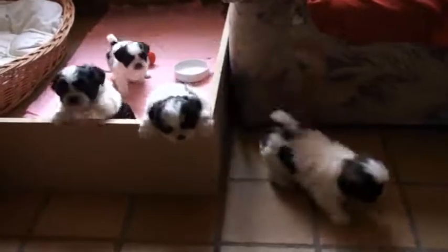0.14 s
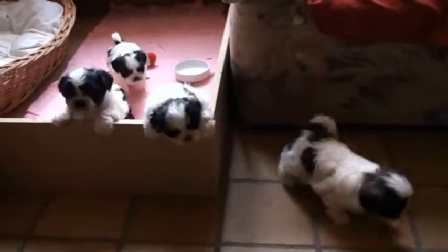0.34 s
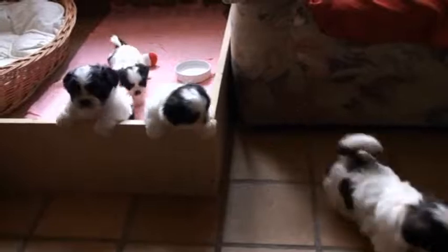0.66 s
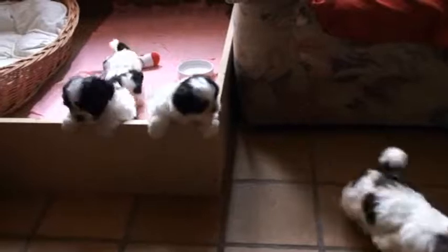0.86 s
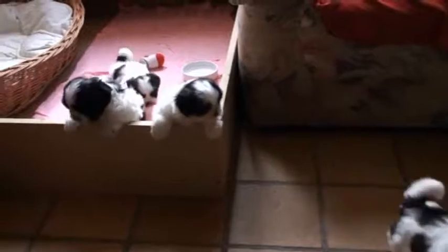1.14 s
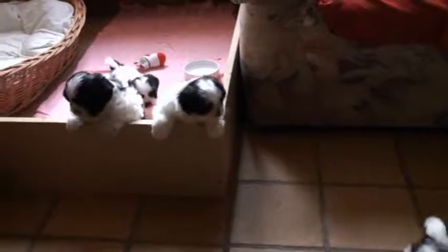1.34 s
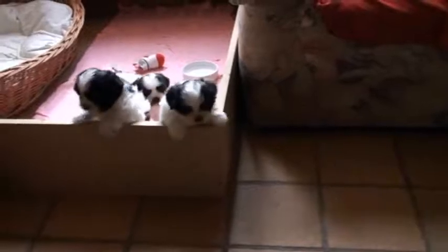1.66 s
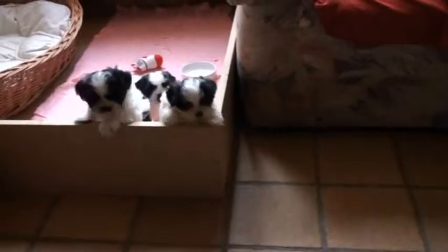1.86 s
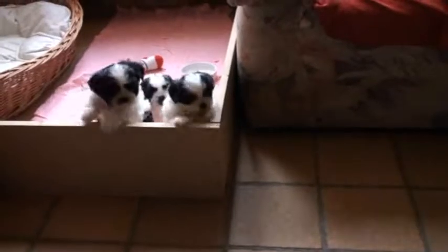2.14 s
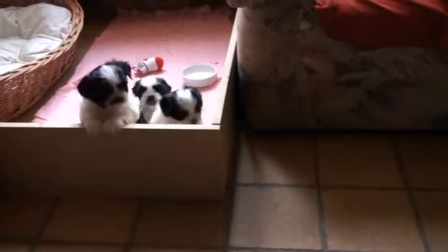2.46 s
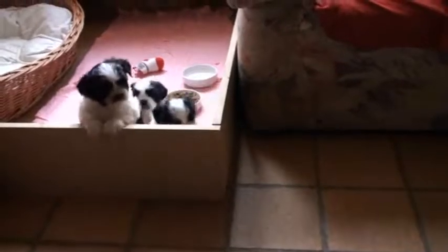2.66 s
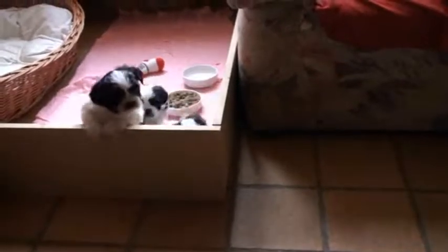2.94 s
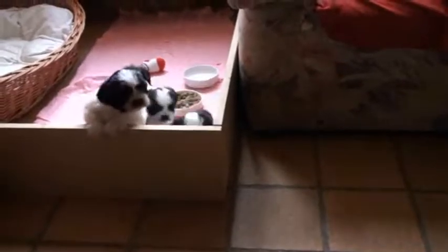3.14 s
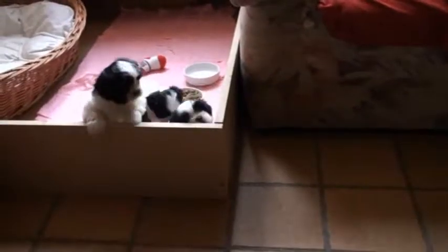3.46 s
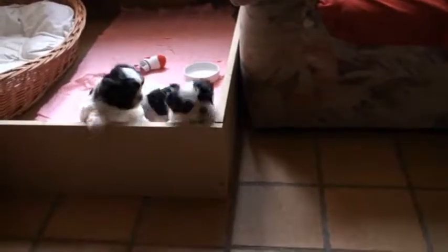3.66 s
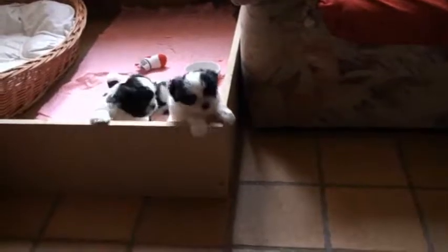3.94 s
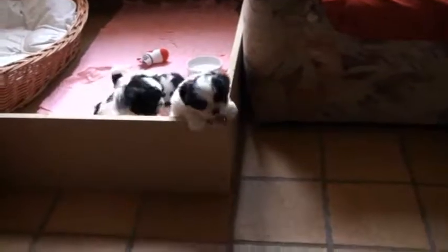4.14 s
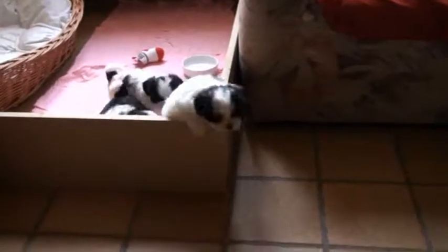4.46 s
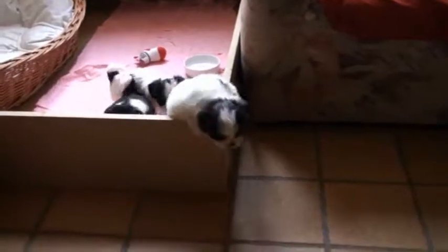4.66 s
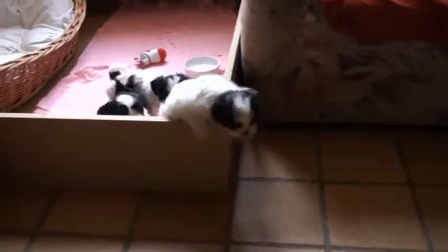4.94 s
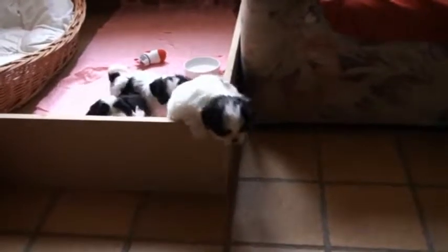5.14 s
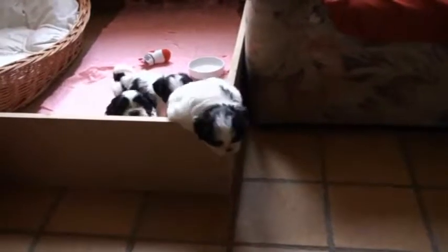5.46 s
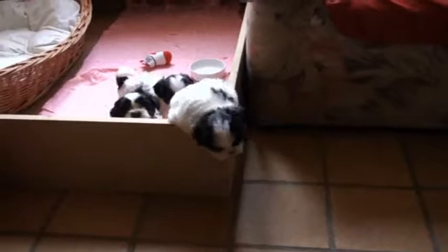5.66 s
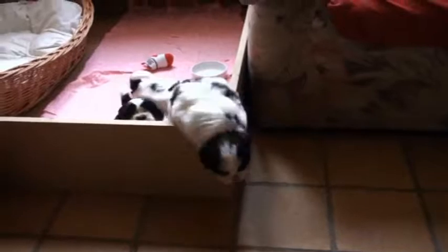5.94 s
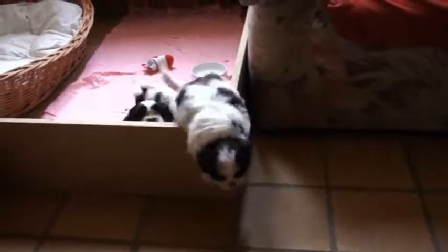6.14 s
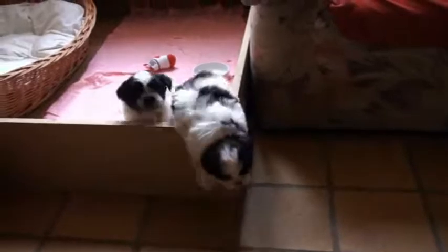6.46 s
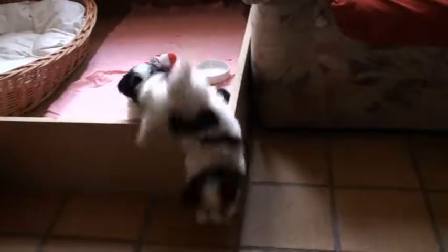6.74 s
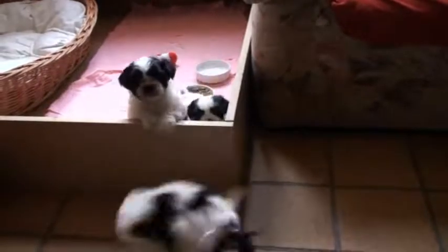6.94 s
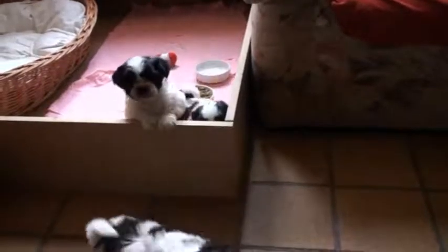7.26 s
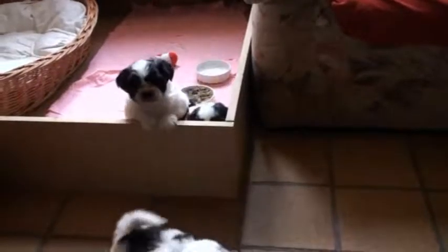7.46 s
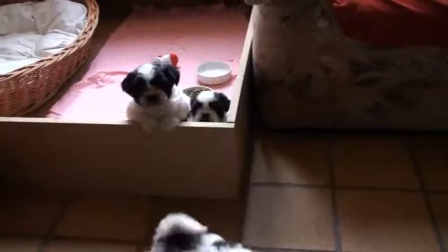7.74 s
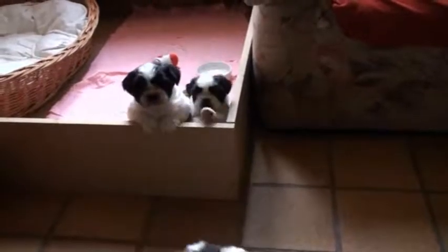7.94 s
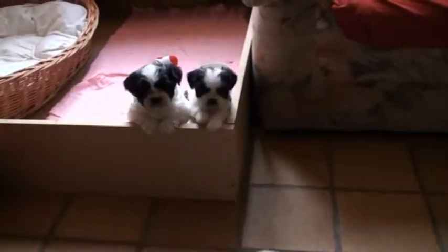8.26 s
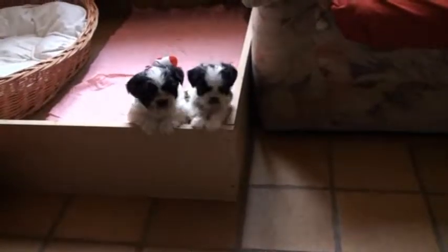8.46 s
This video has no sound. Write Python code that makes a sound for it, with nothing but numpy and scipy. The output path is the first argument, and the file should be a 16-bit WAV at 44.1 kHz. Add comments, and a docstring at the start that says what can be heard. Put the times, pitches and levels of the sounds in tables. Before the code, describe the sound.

In a quiet tiled room with faint air noise and low rumble, a shrill yelp sounds from farther off at 0 s as fur brushes wood. Tiny nearer yips, distant yelps and light paw taps scatter through the first 1.2 s. From 1.5 to 4.2 s, puppies in a wooden box give six gliding, wavering whines around 1 kHz, rough at the edges, with soft thuds near 1.7 and 1.9 s. A shaky far squeal overlaps around 4 s, then a strong hissing paw scrape at 4.4 s. Short yips, knocks and a low gruff grumble at 5.4 s follow. From 6.15 to 6.7 s a loud, piercing, echoing squeal swings up and down. At 6.8-6.95 s a puppy tumbles out with heavy wooden thumps and claw clicks; small steps and scuffs fade until 8.5 s, when one faint yelp ends it. The sound leans right.

```python
"""A shrill yelp from farther off, carried mostly by the room, sounds as fur brushes boards in a quiet room.
Puppies whine and yip in a wooden box on a tiled floor, a little to the right: gliding harmonic voices.
Paws knock and scrape on the box, as decaying modes, thuds and shaped friction noise; one puppy tumbles
over the edge, lands on the tiles and pads away. Echoes, box reflections and a diffuse tail add the space."""
import sys
import numpy as np
from scipy import signal
from scipy.fft import rfft, irfft
from scipy.io import wavfile

SR = 44100
rng = np.random.default_rng(int(sys.argv[2]) if len(sys.argv) > 2 else 0)


def transcribe(signal):
    """Save signal, clipped to [-1, 1], as a 16-bit WAV file at the path in sys.argv[1]."""
    frames = np.atleast_2d(signal).T
    limited = np.clip(frames, -1, 1)
    pcm = np.round(limited * 32767).astype(np.int16)
    wavfile.write(sys.argv[1], SR, pcm)


N = 379260
TIME = np.arange(N) / SR
EDGE_HZ = 15850  # upper band limit

# broadband spectrum shared by claw impacts and breath: [f/Hz, level/dB]
CLAW_COLOUR = [(300, -12), (1500, -4), (2700, -4), (3300, -11.5), (4000, -8.5), (7000, -15.5), (10000, -25),
               (16000, -38)]


def amp(db):
    """Level definition: decibels to an amplitude ratio."""
    return 10 ** (np.asarray(db) / 20)


def unit(x):
    """Normalisation to rms 1."""
    return x / np.sqrt(np.mean(x ** 2) + 1e-20)


def read(points, hz):
    """Interpolation of a spectrum along logarithmic frequency."""
    f, value = np.transpose(points)
    return np.interp(np.log(hz + 1), np.log(f + 1), value)


def curves(rows):
    """Piecewise-linear trajectories: the sample times of a table, then its interpolated columns."""
    s, *columns = np.transpose(rows)
    t = np.arange(s[0], s[-1], 1 / SR)
    return [t] + [np.interp(t, s, c) for c in columns]


def add(mix, s, sound):
    """Superposition of a sound onto the mix from time s."""
    part = mix[max(0, round(s * SR)):][:len(sound)]
    part += sound[:len(part)]


def track(sounds):
    """Superposition of (s, sound) pairs on one track."""
    mix = np.zeros(N)
    for s, sound in sounds:
        add(mix, s, sound)
    return mix


def noise(colour, size):
    """Spectral shaping of white noise, scaled to rms 1."""
    hz = np.fft.rfftfreq(size, 1 / SR)
    white = rng.standard_normal(size)
    return unit(irfft(rfft(white) * amp(read(colour, hz)), size))


def waver(rate_hz, size):
    """Low-pass random modulation of up to a second, with rms 1 over that second."""
    hz = np.fft.rfftfreq(SR, 1 / SR)
    white = rng.standard_normal(SR)
    return unit(irfft(rfft(white) / (1 + (hz / rate_hz) ** 4), SR))[:size]


def fade(t, edge):
    """Sine-squared onset and release, each edge seconds long."""
    nearest_end = np.minimum(t - t[0], t[-1] - t)
    return np.sin(np.pi / 2 * np.clip(nearest_end / edge, 0, 1)) ** 2


def gesture(s, length):
    """Time base of a short call: sample times, progress from 0 to 1, and a half-sine arch."""
    t = np.arange(s, s + length, 1 / SR)
    u = (t - s) / length
    return t, u, np.sin(np.pi * u)


def floor(apart=1.0):
    """Partial coherence: room noise partly shared by two microphones, over a common low rumble."""
    # spectrum of the quiet room: [f/Hz, relative level/dB]
    air_colour = [(15, -37), (25, -23), (93, -10.5), (253, -3.5), (389, -7.5), (509, -7.5), (1170, -6.5),
                  (1410, -9.5), (1950, -10.5), (4620, -20), (7910, -21.5), (9810, -28), (15500, -24.5)]
    # air noise before channel balance: [t/s, level/dB]
    air_level = [(0, -48.5), (1.4, -52), (5, -49), (8.6, -53.5)]
    # low rumble before channel balance: [t/s, level/dB]
    rumble_level = [(0, -54), (1.3, -54), (3.5, -63.5), (8.6, -67)]
    # [f/Hz, level/dB]
    rumble_colour = [(15, -2.0), (30, 1), (45, -3.5), (85, 1.0), (140, -7.5), (400, -14), (2000, -76)]
    air = noise(air_colour, N) + apart * np.array([noise(air_colour, N), noise(air_colour, N)])
    rumble = noise(rumble_colour, N)
    air = unit(air) * amp(np.interp(TIME, *np.transpose(air_level))) * amp([[-1], [.5]])
    return air + rumble * amp(np.interp(TIME, *np.transpose(rumble_level))) * amp([[-5], [4]])


def room(x, build=0.0057):
    """Diffuse reverberation: independent tails per channel, each band with its own decay time."""
    # reverberation time of the room: [f/Hz, t60/s]
    decay = [(200, 0.38), (700, 0.31), (1700, 0.38), (3200, 0.38), (6000, 0.36), (14000, 0.16)]
    hz, t, z = signal.stft(rng.standard_normal((2, SR)), SR, nperseg=256)
    t60 = read(decay, hz)[:, None]
    envelope = amp(-60 * t / t60) * (1 - np.exp(-t / build))
    tail = signal.istft(z * envelope, SR, nperseg=256)[1]
    tail /= np.linalg.norm(tail, axis=1, keepdims=True)
    return signal.fftconvolve(x[None], tail, axes=1)[:, :N]


def box(x, t60=0.1):
    """Dense early reflections: a quick decaying spray between the walls of the box."""
    t = np.arange(SR // 12) / SR
    spray = rng.standard_normal((2, len(t))) * amp(-60 * t / t60) * (t > .003)
    spray /= np.linalg.norm(spray, axis=1, keepdims=True)
    return signal.oaconvolve(x[None], spray, axes=1)[:, :N]


def reflect(x):
    """Comb interference: direct sound plus delayed copies makes gliding notes swell and dip."""
    # first reflections off box and floor, a list for the left then the right: [delay t/s, gain]
    echoes = [
        [(.0023, .14), (.0061, .14)],
        [(.0031, 0.21), (.0074, .12)],
    ]

    def echo(delay, gain):
        """Propagation delay: an attenuated later copy."""
        return gain * np.interp(TIME - delay, TIME, x, left=0)

    return np.array([x + sum(echo(*row) for row in port) for port in echoes])


def grumble():
    """Source-filter voice: a low gruff unsteady harmonic stack through a half-closed mouth."""
    # a grumble from across the room: [t/s, mean pitch f/Hz, level/dB]
    path = [(5.378, 270.6, -32.5), (5.42, 310.7, -35.5), (5.455, 350, -40), (5.48, 263, -35.5),
            (5.52, 245, -51)]
    # filtering by throat and mouth: [f/Hz, level/dB]
    throat = [(150, -32), (300, -4), (550, -5), (950, 8), (1500, -12.5), (2500, -10.5), (5000, -52)]
    t, hz, level_db = curves(path)
    turns = np.cumsum(hz * (1 + .022 * waver(120, len(t)))) / SR
    stack = sum(amp(read(throat, k * hz)) * np.sin(2 * np.pi * k * turns) for k in range(1, 13))
    return t[0], amp(level_db) * unit(stack) * fade(t, 0.014)


def squeal(t, hz, level_db, jitter=0.0299, wheeze=0.0706, firm_db=-32, flutter=0.2,
           second_db=-17.5, third_db=-30, grain_db=3):
    """Unstable phonation: shaky and rasping when low, wheezy when weak, nearly pure when loud and high."""
    # rasping air in a distant yelp: [f/Hz, level/dB]
    rasp_colour = [(800, -51), (2000, 6.5), (3000, -2), (3900, -5.5), (5000, -6), (6000, -2.5), (7200, -17),
                   (9000, -13.5), (11000, -30), (15500, -24)]
    size = len(t)
    weak = np.clip((firm_db - level_db) / 10, 0, 1)
    shake = jitter * np.minimum((2700 / hz) ** 4, 2) * waver(136.3, size)
    shake = shake + wheeze * weak * waver(434, size)
    turns = np.cumsum(hz * (1 + shake)) / SR
    harmonics_db = [0, second_db, third_db]
    stack = sum(amp(db) * np.sin(2 * np.pi * (k + 1) * turns) for k, db in enumerate(harmonics_db))
    voice = amp(level_db) * unit(stack * (1 + flutter * waver(220, size)))
    # above the knee, rasp grows only 0.152 dB for each dB of voice
    knee_db = -23
    rasp_db = np.minimum(level_db, knee_db + 0.152 * (level_db - knee_db))
    # it lies 11 dB lower at 2.7 kHz and clears by 17 dB per octave as the pitch climbs
    rasp_db = rasp_db - 11 - 17 * np.log2(hz / 2700)
    rasp = amp(rasp_db + grain_db * waver(150, size)) * noise(rasp_colour, size)
    return t[0], (voice + rasp) * fade(t, 0.0016)


def yelp(s, length, from_hz, to_hz, arch_hz, level_db, swell_db):
    """Frequency modulation: a short squeal on one bent glide."""
    t, u, arch = gesture(s, length)
    hz = from_hz + (to_hz - from_hz) * u + arch_hz * arch
    return squeal(t, hz, level_db + swell_db * (u - .5))


def scuff(s, length, level_db, grain_db=2):
    """Sliding friction: grainy noise of a paw that swells and fades."""
    # paws and fur sliding on wood and tile: [f/Hz, level/dB]
    colour = [(200, -9), (900, 0), (2000, -1), (3500, -6), (7500, -3.5), (10000, -8), (16000, -17)]
    size = int(length * SR)
    grain = amp(level_db + grain_db * waver(140, size))
    return s, grain * noise(colour, size) * np.sin(np.linspace(0, np.pi, size))


def hiss(s, rise, fall, level_db, colour, sag_db=15, grain_db=-1.0):
    """Stroke friction: sputtering noise swells, then sags as the paw slows."""
    t = np.arange(0, rise + fall, 1 / SR)
    swell = np.sin(np.pi / 2 * np.minimum(t / rise, 1)) ** 2
    shape = swell * amp(-sag_db * np.maximum(t - rise, 0) / fall)
    return s, shape * amp(level_db + grain_db * waver(200, len(t))) * noise(colour, len(t))


def ring(modes, t):
    """Modal superposition: decaying partials, slightly detuned for each blow."""
    def mode(hz, db, t60):
        """Damped resonance with a random sign."""
        detuned_hz = hz * rng.uniform(0.95, 1.03)
        return amp(db - 60 * t / t60) * np.sin(2 * np.pi * detuned_hz * t) * rng.choice([-1, 1])

    return sum(mode(*row) for row in modes)


def knock(s, thud_db, thud_hz, wood_db, claw_db, thud_t60=0.16, claw_t60=0.024, soft=0.0026):
    """Impact excitation: a soft weight thuds, the boards ring briefly, a claw clicks."""
    # modes of the boards before detuning: [f/Hz, level/dB, t60/s]
    wood = [(142, -15.5, 0.12), (204, -3, 0.15), (439, -3.5, 0.11), (505.5, -2, 0.11), (557, -1, 0.061),
            (662, -2, 0.045), (794, -1, 0.057), (1025, 6, 0.019), (1293, -3, 0.028)]
    # noise in the thud: [f/Hz, level/dB]
    thud_colour = [(30, -22), (60, -12), (85, 2), (140, 3), (200, -13), (320, 2), (700, -47), (2000, -71)]
    # modes of a claw on a hard surface before detuning: [f/Hz, level/dB, t60/s]
    clack = [(2604, -6.5, 0.069), (2780, 0.5, 0.023), (3910, -7.5, 0.032), (4150, -21, .02),
             (6600, -17, .02)]
    t = np.arange(SR // 2) / SR
    pitch = thud_hz * (1 + 0.27 * np.exp(-t / 0.015))  # the body is stiffest as it lands, then gives
    tone = np.sin(2 * np.pi * np.cumsum(pitch) / SR)
    thud = amp(-60 * t / thud_t60) * (0.63 * noise(thud_colour, len(t)) + tone)
    body = amp(thud_db) * thud + 0.64 * amp(wood_db) * ring(wood, t)
    claw = 0.84 * noise(CLAW_COLOUR, len(t)) * amp(-60 * t / claw_t60) + 0.57 * ring(clack, t)
    return s, body * (1 - np.exp(-t / soft)) + amp(claw_db) * claw


def cry(t, hz, level_db, open_db, press_db, rough, build_s, tilt_db, nasal_hz, lift_db,
        tremor=0.004, flutter=0.0044, jitter=0.1103, shimmer=0.89, half_share=0.32, air_db=-34):
    """Source-filter phonation: a harmonic stack whose rough cycles vary and alternate strong and weak."""
    # colour of the small throat above the fundamental: [f/Hz, level/dB]
    throat = [(1700, 18.5), (2400, 18), (3000, 12.5), (3800, -1.5), (5000, -3), (6200, -10.5), (7500, -0.5),
              (8600, -5), (9800, -35), (11500, -9.5), (12800, -14.5), (15500, -20)]
    size = len(t)
    shake = tremor * waver(77, size) + (flutter + jitter * rough) * waver(300, size)
    turns = np.cumsum(hz * (1 + shake)) / SR

    k = np.arange(2, 19)[:, None]
    harmonic_hz = k * hz
    nasal_octaves = 0.14  # half width of the resonance, at 1/e of its dB lift
    nasal_db = lift_db * np.exp(-(np.log2(harmonic_hz / nasal_hz) / nasal_octaves) ** 2)
    gains = amp(read(throat, harmonic_hz) + nasal_db) * (harmonic_hz < EDGE_HZ)

    # an open mouth moves the voice into the harmonics near 2.5 kHz; pressed folds lift the ones above
    upper = np.clip((harmonic_hz - 3400) / 400, 0, 1)
    mouth = gains * (1 - upper)
    press = gains * upper * amp(tilt_db * np.log2(np.minimum(harmonic_hz, 8000) / 6000))
    # upper harmonics grow by 10.5 dB per octave of pitch and 0.42 dB per dB of mouth opening
    upper_db = press_db + 10.5 * np.log2(hz / 1100) + 0.42 * open_db
    # they start 12 dB down, until pressure builds
    upper_db = upper_db - 12 * np.exp(-((t - t[0]) / build_s) ** 2)
    fundamental = 1 / np.hypot(1, amp(open_db))
    mouth_gains = fundamental * amp(open_db) * mouth / np.linalg.norm(mouth, axis=0)
    gains = mouth_gains + amp(upper_db) * press / np.linalg.norm(press, axis=0)

    # an echo in the box partly cancels the fundamental: 4 dB at 1230 Hz
    dip = amp(-4 * np.exp(-((hz - 1230) / 39) ** 2))
    overtones = (gains * np.sin(2 * np.pi * k * turns)).sum(0)
    voice = np.sqrt(2) * (dip * fundamental * np.sin(2 * np.pi * turns) + overtones)
    # the half-pitch cosine makes alternate cycles strong and weak
    voice *= 1 + rough * (shimmer * waver(430, size) + half_share * np.cos(np.pi * turns))
    air = amp(air_db) * (1 + 4 * rough) * noise(CLAW_COLOUR, size)
    return t[0], amp(level_db) * (voice + air) * fade(t, .008)


def yip(s, length, from_hz, to_hz, level_db, swell_db, open_db, press_db, rough, lift_db):
    """Articulated glide: the pitch slides in an S while the mouth opens and shuts once."""
    t, u, arch = gesture(s, length)
    hz = from_hz + (to_hz - from_hz) * np.sin(np.pi / 2 * u) ** 2
    mouth_db = open_db - 7.5 * (1 - arch)  # 7.5 dB more closed at both ends
    roughness = rough * (1 - 0.55 * arch)  # 55 % of it clears in the middle
    return cry(t, hz, level_db + swell_db * (u - .5), mouth_db, press_db, roughness,
               build_s=0.0031, tilt_db=3, nasal_hz=7410, lift_db=lift_db)


def whine(rows, rough_start, rough_end, press_db, build_s, tilt_db, nasal_hz, lift_db):
    """Phonation onset and offset: a gliding cry catches roughly, holds clean and breaks up as it ends."""
    t, hz, level_db, open_db = curves(rows)
    breaking = np.exp(-((t - t[0]) / rough_start) ** 4) + np.exp(-((t[-1] - t) / rough_end) ** 4)
    rough = 0.012 + 0.47 * breaking  # held note, plus the voice catching or giving out
    return cry(t, hz, level_db, open_db, press_db, rough, build_s, tilt_db, nasal_hz, lift_db)


def far_cries():
    """Superposition of the distant yelps, squeals and grumble."""
    # short yelps: [t/s, length t/s, start f/Hz, end f/Hz, arch f/Hz, level/dB, swell/dB]
    yelps = [(0, 0.082, 3357, 2477, -250, -42.5, -5), (0.208, 0.044, 3376, 2550, -150, -38, 12),
             (0.631, .08, 3720, 3500, -1, -50.5, -9), (1.102, .14, 3040, 2520, 197.5, -46.5, 10),
             (2.279, 0.098, 2990, 3350, 2, -46.5, 8), (3.788, 0.088, 2685, 2750, 623, -36.5, -15),
             (5.272, 0.049, 3265, 2530, 100, -41.5, 5), (6.073, 0.078, 2680, 3000, 103, -43, 6),
             (8.509, 0.035, 2904, 1990, -3, -45.5, -2)]
    # one table for each long squeal: [t/s, mean pitch f/Hz, level/dB]
    squeals = [
        [(3.895, 1907, -33.5), (3.925, 2255, -30), (3.965, 1879, -28), (4.015, 2950, -23), (4.05, 2775, -29),
         (4.09, 2090, -26.5), (4.145, 3117, -19), (4.18, 2817, -35.5), (4.24, 2266, -37)],
        [(6.155, 1844, -35), (6.19, 2103, -22), (6.225, 2277, -21), (6.258, 3176, -11.5), (6.295, 3277, -16.5),
         (6.335, 3166, -15.5), (6.37, 2840, -25), (6.395, 1860, -28), (6.45, 2145, -26), (6.505, 3092, -19.5),
         (6.56, 2637, -26), (6.615, 3320, -18), (6.685, 3180, -28), (6.72, 3210, -48)],
    ]
    return track([yelp(*row) for row in yelps] + [squeal(*curves(rows)) for rows in squeals] + [grumble()])


def friction_strokes():
    """Superposition of friction noises from paws and fur."""
    # sliding paws and fur: [t/s, length t/s, level/dB]
    scuffs = [(0.273, 0.2, -47), (0.588, 0.088, -47.5), (1.33, 0.14, -53.5), (2.41, 0.069, -49.5),
              (4.484, 0.16, -52.5), (4.981, 0.21, -51), (5.833, 0.11, -52), (6.85, 0.15, -45),
              (7.047, 0.057, -44), (7.362, 0.15, -52), (7.519, .12, -45), (8.309, .16, -51.5),
              (8.495, 0.05, -64)]
    # sharp hissing scrapes: [t/s, rise t/s, fall t/s, level/dB]
    scrapes = [(4.219, 0.051, 0.048, -33), (4.362, 0.049, .11, -23)]
    # a paw scraping hard on wood: [f/Hz, level/dB]
    scrape_colour = [(500, -48), (1800, -14.5), (2700, -1.5), (3800, -3), (5000, 3), (6500, 0.5),
                     (8000, -7.5), (10500, -14), (12500, -23), (16000, -22)]
    # fur brushing the boards: [t/s, rise t/s, fall t/s, level/dB]
    brushes = [(0, .015, 0.14, -57), (.2, 0.043, 0.082, -43)]
    # brushing fur: [f/Hz, level/dB]
    brush_colour = [(1000, -16), (4000, -15), (7000, 7), (9500, 1), (12000, 1), (15500, -12)]
    sounds = [scuff(*row) for row in scuffs]
    sounds += [hiss(*row, scrape_colour) for row in scrapes]
    sounds += [hiss(*row, brush_colour) for row in brushes]
    return track(sounds)


def paw_knocks():
    """Superposition of impacts on wood and tile, including the tumble and the steps away."""
    # paws and bodies: [t/s, thud level/dB, settled thud f/Hz, knock level/dB, claw click level/dB]
    knocks = [(0.153, -36, 80, -49, -49), (0.166, -42, 84, -42, -27), (.73, -67, 90, -54, -41),
              (1.736, -35, 87, -35, -48), (1.94, -32.5, 92, -32, -51), (2.43, -63, 120, -38, -31),
              (3.771, -55, 99, -52, -34), (4.371, -40.5, 85.5, -64, -41), (4.82, -43, 353, -44, -65),
              (5.056, -37.5, 286, -38, -32.5), (5.541, -62, 141, -46, -42), (5.94, -65, 138, -45, -32.5),
              (6.805, -27, 86, -22.5, -40), (6.899, -36, 140, -26.5, -21), (6.912, -22.5, 138, -18, -29),
              (6.93, -29.5, 85, -43, -50), (7.035, -42, 91, -60, -53), (7.066, -67, 90, -46, -41),
              (7.117, -54, 90, -33.5, -44), (7.158, -39, 112, -52, -43)]
    return track(knock(*row) for row in knocks)


def near_cries():
    """Superposition of the yips and whines in the box."""
    # short yips: [t/s, length t/s, start f/Hz, end f/Hz, level/dB, swell/dB, widest mouth opening/dB,
    # pressure/dB, roughness (0-1), nasal lift/dB]
    yips = [(0.093, 0.038, 956, 1315, -29, -4, 0, -18, 0.43, 3),
            (0.285, 0.072, 896, 1286, -26, 13, 1, -17, 0.2, -6),
            (0.569, .05, 888, 1251, -30, 0, -1, -19, 0.27, 2),
            (.835, 0.034, 974, 977, -33.5, 0, -13.5, -21, 0.5, 8),
            (1.067, 0.048, 914, 1107, -33, 8.5, -5.5, -15, 0.69, 4),
            (4.439, .034, 1273, 1394, -33, -7, -3, -23, 0.08, 3),
            (4.634, 0.099, 1014, 1386, -24, 0.5, 2, -19.5, 0.04, 4),
            (5.129, 0.12, 1338, 1365, -31.5, 4, 1, -9.5, 0.15, 31),
            (5.634, 0.089, 1200, 1481, -33.5, -0.5, -5, -17.5, 0.3, 8),
            (5.942, 0.085, 1264, 1471, -27.5, -4, -3.5, -19.5, 0.21, 10)]
    # one table for each long whine: [t/s, mean pitch f/Hz, level/dB,
    # mouth opening/dB = lower overtones re fundamental]
    whines = [
        [(1.502, 1138, -29.5, -8), (1.53, 1295, -37.5, -7), (1.56, 1345, -35.5, -11), (1.6, 1214, -27.5, -8.5),
         (1.655, 1326, -30.5, -7), (1.7, 1250, -28, -8), (1.738, 1250, -26.5, -10)],
        [(1.859, 938, -34, -16), (1.882, 840, -31.5, -6), (1.915, 992, -28, -15.5), (1.965, 1067, -27, -5.5),
         (2.02, 1417, -29, -4.5), (2.06, 1176, -26.5, 0), (2.1, 1240, -27, 6), (2.16, 1094, -21.5, -5),
         (2.23, 1002, -21.5, -6), (2.282, 1005, -20.5, -8), (2.305, 850, -29.5, -10)],
        [(2.499, 979, -31.5, -10), (2.524, 1230, -34, -7), (2.541, 900, -38, 1), (2.55, 892.4, -24, -9.5),
         (2.6, 917, -25.5, -8.5), (2.64, 943.4, -37, 14), (2.685, 948, -23, -6.5), (2.73, 927, -29.5, 2.5),
         (2.78, 901.4, -18.5, -16), (2.83, 866.5, -24, -7.5), (2.882, 873, -23, -8)],
        [(3.072, 821, -34, -10), (3.12, 1222, -25.5, 4), (3.15, 1194, -27, -6.5), (3.18, 942, -25, 1.5),
         (3.228, 870, -24.5, -5), (3.25, 905.4, -26, -0.5), (3.32, 822, -25, -10)],
        [(3.537, 1008, -31.5, -7), (3.56, 1068, -25.5, 1.5), (3.582, 1248, -25.5, 1), (3.645, 1049, -22, 0),
         (3.69, 1036, -25, -2), (3.74, 982.6, -24, -5), (3.775, 992, -37, -2)],
        [(3.982, 972, -21.5, 2), (4.005, 1031, -25, -3), (4.035, 1280, -29.5, -9), (4.065, 1214, -29.5, -6),
         (4.1, 1079, -23, -13), (4.15, 1183, -24, -9), (4.195, 1310, -25, 1.5), (4.215, 1390, -28, -11)],
    ]
    # voice of each whine: [rough start t/s, rough end t/s, pressure/dB, pressure build-up t/s,
    # treble tilt/(dB per octave), nasal centre f/Hz, nasal lift/dB]
    voices = [(0.023, 0.013, -12, 0.024, -1, 12800, 7), (0.0086, 0.015, -14, 0.12, -3, 11730, 12),
              (0.057, 0.0552, -10, 0.078, 6, 7050, 6.5), (.01, 0.0843, -18.5, 0.045, 0, 7300, 5.5),
              (0.0055, 0.0096, -12, 0.015, 4.5, 7400, 5.5), (0.0046, 0.012, -11, .02, 2, 11500, 8.5)]
    return track([yip(*row) for row in yips] + [whine(rows, *voice) for rows, voice in zip(whines, voices)])


def scene():
    """Direct-to-reverberant balance: near sounds arrive more directly, far cries by way of the room."""
    far, slides, paws, cries = far_cries(), friction_strokes(), paw_knocks(), near_cries()
    # the paired gains are left and right, in dB
    distant = amp(-7.5) * reflect(far) + amp(-7) * box(far) + amp(-3.0) * room(far)
    distant = distant * amp([[-6], [2.7]])
    friction = amp(-6) * reflect(slides) + amp(-2.5) * box(slides) + amp(-7.0) * room(slides)
    friction = friction * amp([[-5], [2.5]])
    blows = (reflect(paws) + amp(-5) * room(paws)) * amp([[-3], [2.5]])
    near = amp(-3.5) * reflect(cries) + amp(-6) * box(cries) + amp(-8) * room(cries)
    near = near * amp([[-3.7], [2]])
    return floor() + distant + friction + blows + near


def record(dry):
    """Linear filtering: the left microphone is thinner in bass and duller on top; both are band-limited."""
    # [f/Hz, level/dB]
    left_colour = [(25, -11), (70, -7.5), (140, -7.5), (300, -1.5), (600, 1), (7000, -1),
                   (10800, 3.5), (11800, -2.5), (16000, -23)]
    hz = np.fft.rfftfreq(N, 1 / SR)
    left = irfft(rfft(dry[0]) * amp(read(left_colour, hz)), N)
    low_pass = signal.firwin(511, EDGE_HZ, window=("kaiser", 9), fs=SR)
    return signal.oaconvolve(np.array([left, dry[1]]), low_pass[None], "same")


dry = scene()
out = record(dry)
transcribe(out)
```